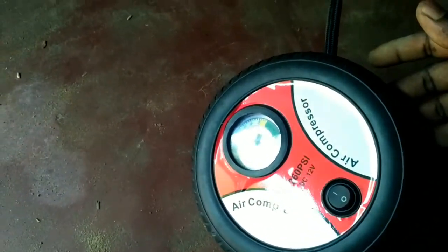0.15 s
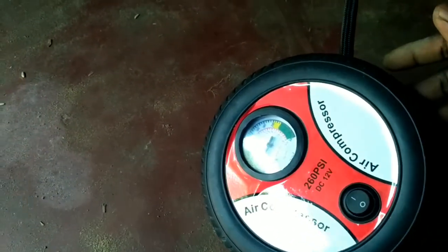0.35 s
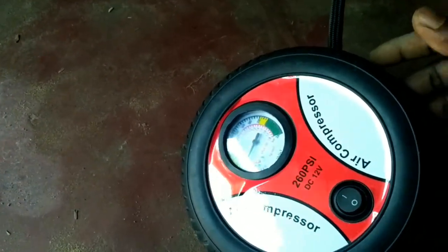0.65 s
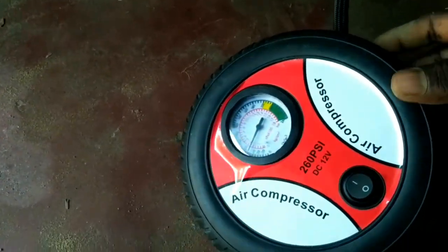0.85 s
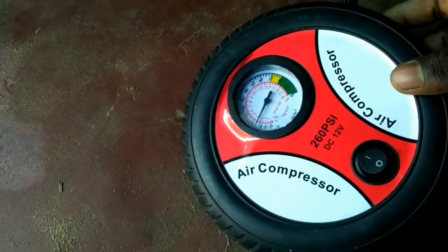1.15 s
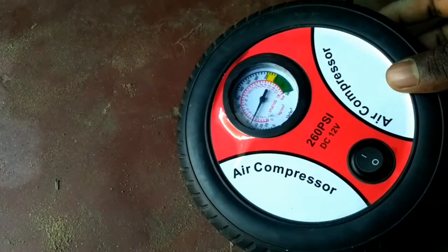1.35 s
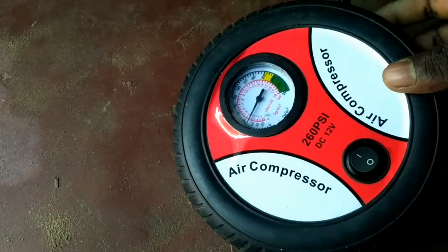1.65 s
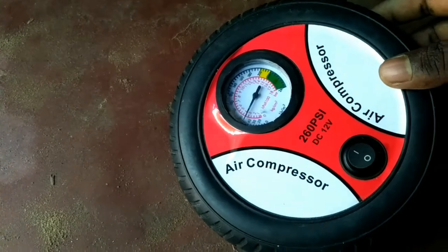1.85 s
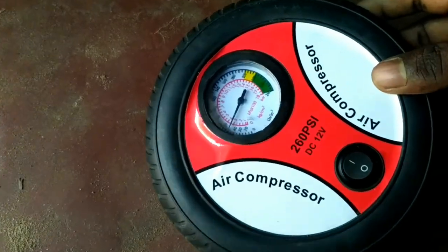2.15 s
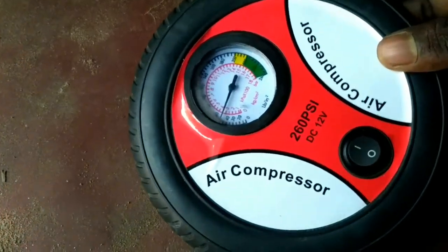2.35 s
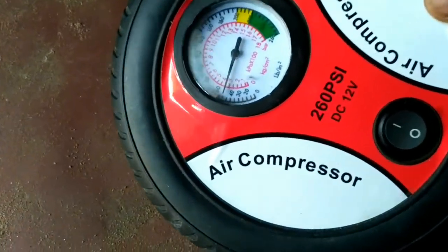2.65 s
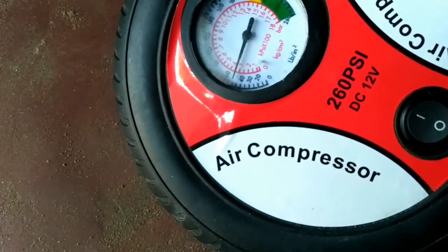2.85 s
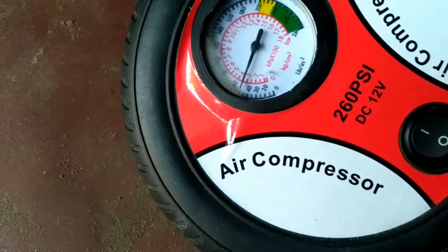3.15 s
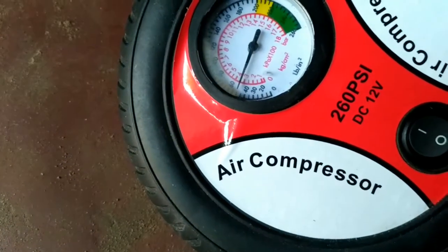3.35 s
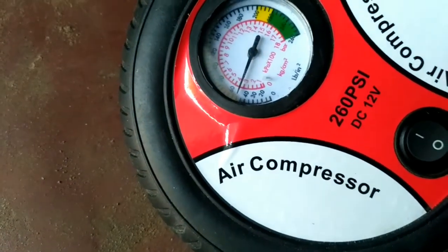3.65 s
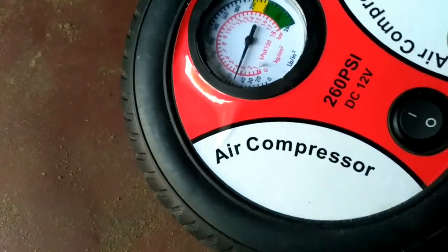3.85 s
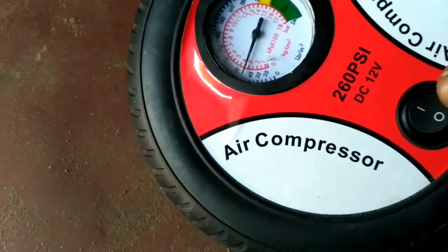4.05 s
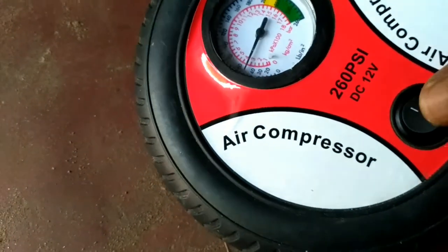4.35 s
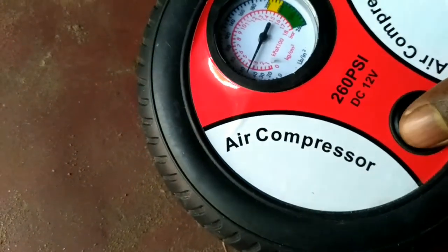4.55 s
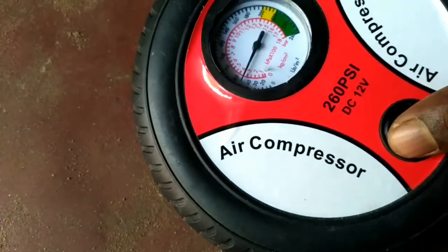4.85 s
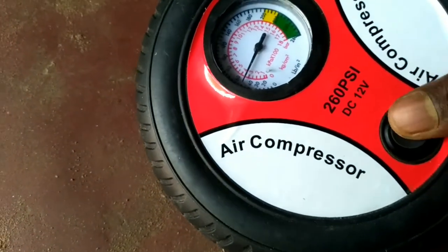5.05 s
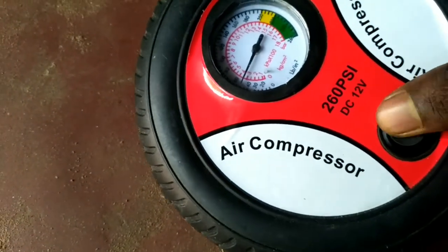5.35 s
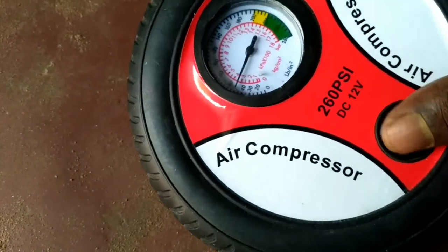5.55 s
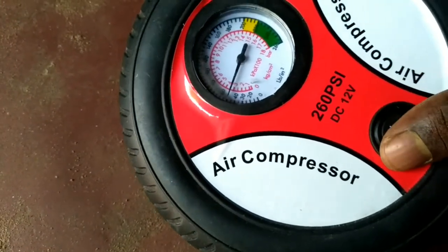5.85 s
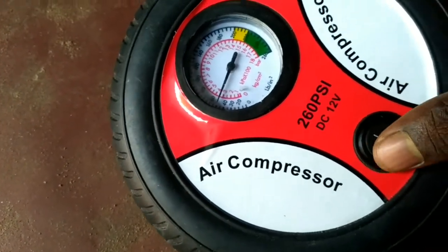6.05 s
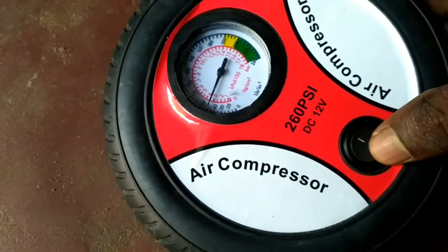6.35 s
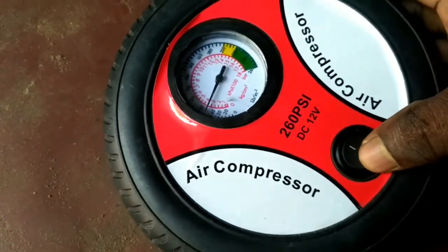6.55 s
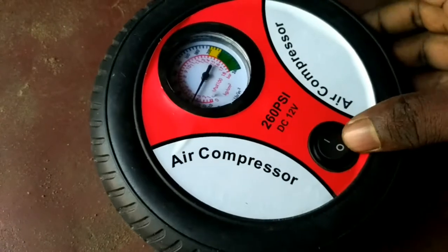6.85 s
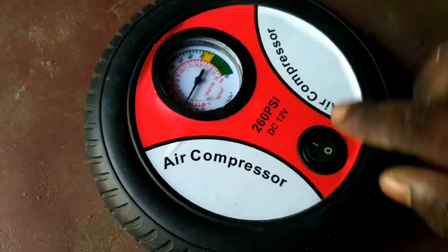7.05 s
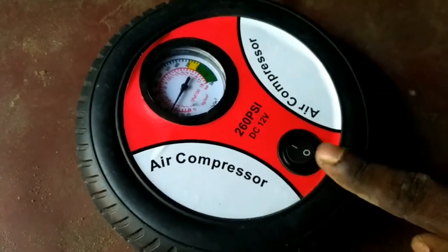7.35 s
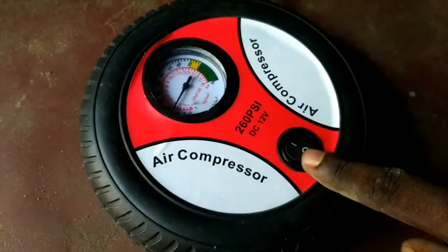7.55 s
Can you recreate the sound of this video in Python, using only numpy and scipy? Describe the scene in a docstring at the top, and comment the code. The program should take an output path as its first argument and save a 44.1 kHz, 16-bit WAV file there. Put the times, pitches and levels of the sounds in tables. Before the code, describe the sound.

A small piston air compressor hammers steadily up close, a loud buzzing drone with gear whine, rattle and hissing air, never stopping.

```python
"""On a concrete floor, right under a phone, a small piston compressor is held while it pumps up a tyre.
A three-pole motor drives the crank through a 12:51 gear: the case drones in step with the turns,
the teeth sing on the compression stroke, air and loose parts rasp, and the valve whistles.
The colour changes as the phone leans in, a finger presses, a thumb rests on the lid and the hand lets go.
The phone's fast limiter flattens the peaks."""
import sys
import numpy as np
from scipy import signal
from scipy.fft import rfft, irfft
from scipy.io import wavfile
from scipy.ndimage import uniform_filter1d, minimum_filter1d, map_coordinates

SR = 44100
rng = np.random.default_rng(int(sys.argv[2]) if len(sys.argv) > 2 else 0)


def store_pcm(level_fs):
    """Save levels as 16-bit WAV."""
    pcm = np.round(np.clip(level_fs, -1, 1) * 32767).astype(np.int16)
    wavfile.write(sys.argv[1], SR, np.atleast_2d(pcm).T)


N = 339570  # length [samples]

# crank speed: (time [s], speed [turns per second])
CRANK_SPEED = [(0.0, 44.99), (1.1, 44.92), (1.32, 45.23), (1.94, 44.7), (2.24, 44.91), (2.62, 44.44),
               (2.7, 44.67), (3.86, 44.95), (4.16, 44.86), (4.52, 44.74), (4.82, 43.68), (5.26, 44.55),
               (5.72, 44.46), (5.9, 44.04), (6.16, 44.39), (6.48, 43.92), (7.5, 44.41), (7.7, 43.75)]
# balance of the drone's tones: (multiple of the crank speed, relative level [dB])
DRONE_TONES = [(3, -22), (4, -21.5), (5, -15.5), (6, -16), (7, -13.5), (8, -18), (10, -4), (11, 1),
               (12, 1.5), (13, 0.5), (14, 1), (15, -2.5), (16, -2.5), (17, -8.5), (18, -5), (19, -4),
               (20, -20.5), (22, -16), (25, -31), (32, -24.5)]
# knocks of piston and valve, which set how the drone's tones line up in time:
# (place [turns], signed force when held [relative], when pressed [relative], when loose [relative])
KNOCKS = [(.08, .21, .06, .07), (.29, 0, .19, .26), (.506, -.5, -.22, -.2), (.592, .18, .34, 0),
          (.807, -.33, -.16, -.2)]
# one turn of the crank: (place [turns], tooth load [dB], air flow [dB])
STROKE = [(.05, 5.5, 0), (0.16, 7.5, -1), (.3, -11, -9.5), (.42, -2, -12), (.54, -23, -2.5), (.67, -21, -6),
          (.77, -15, -8.5), (.86, -8, 1.5), (.96, 4.5, 2)]
# tone colours, each (frequency [Hz], relative level [dB])
AIR_COLOUR = [(1500, -3.5), (2500, -2), (3200, -7), (3700, -9), (4100, -10.5), (4700, 4), (5600, -2),
              (6800, 0), (7800, -1.5), (9000, -0.5), (10000, -4), (11000, 4.5), (11900, -10.5),
              (15500, -32)]
CLATTER_COLOUR = [(500, 1), (950, -8), (1150, 6.5), (1450, 5), (1800, 1.5), (2300, 9), (2650, 3),
                  (3100, -8), (8000, -19)]
SHUDDER_COLOUR = [(20, -9.5), (42, -17), (65, -15), (100, -16), (160, -8.5), (230, -3.5), (330, -0.5),
                  (420, -5), (560, 3.5), (820, -1), (1000, -12.5), (4000, -92)]
WHISTLE_COLOUR = [(6000, -36), (8500, -6.5), (9050, 6.5), (9600, -6), (13000, -46)]
GEARBOX_COLOUR = [(1700, 10), (2050, 1), (2180, 7.5), (2280, 5), (2380, 7.5), (2700, -8), (4500, 7),
                  (9000, -30)]
# taps of the loose case on the floor, over four turns:
# (place [turns], frequency [Hz], width [Hz], level [dB])
TAPS = [(.4, 1550, 390, -29), (1.25, 1090, 350, -30), (2.25, 1080, 350, -23), (3.0, 2640, 200, -39),
        (3.3, 1520, 350, -31)]
# the phone leans in over the gauge and backs off: (time [s], nearness [0-1])
NEARNESS = [(0, 0), (1.1, 0), (2.2, 0.18), (2.8, 0.76), (3.7, 0.56), (4.6, 0.62), (6.5, 0.61), (7.7, 0.18)]
# a finger presses on the case at the switch: (time [s], half length [s], force [0-1])
PRESSES = [(4.835, 0.44, 1), (5.447, 0.12, .3), (5.87, 0.12, 0.66), (6.43, 0.41, .6), (7.615, 0.11, 0.95)]
# a thumb rests on the lid: (time [s], contact [0-1])
THUMB = [(.8, 0), (1.15, 0.9), (2.3, 0.9), (2.65, 0.3)]
# how each part answers the handling:
# (held with the phone far, change when near, change under full press, change when loose)
CASE_HZ = (590, -2.5, -19, -38)  # main resonance of the case, all [Hz]
RESONANCE_DB = (11, 11, 1.6, 8.4)  # how far it stands out, all [dB]; the levels below are [dB] too
DRONE_DB = (-16.5, -1, -0.5, 0)
HUM_DB = (-22.5, 1, -6, -14.5)
SHUDDER_DB = (-26.5, 0.5, 3, 4)
CLATTER_DB = (-32, -0.5, -.5, 0)
AIR_DB = (-41, -4.5, 3.5, -5)  # before the tyre starts to fill
SLAP_DB = (-43, 1.5, -6.5, 1.5)
LOPE_DB = (0.75, 2.8, 0.5, 0.4)  # swing of the tooth load between strong and weak strokes
# one knock of the teeth on the return stroke: (place [turns], frequency [Hz], width of one pass [Hz])
BACKLASH = (.6, 2190, 260)
# gear levels: (time [s], whine under compression [dB], knock on the return stroke [dB])
GEAR_LEVELS = [(0, -19, -36), (.4, -23, -40.5), (1.1, -26, -39), (1.4, -30, -55), (1.9, -25.5, -35.5),
               (2.2, -27.5, -39), (2.55, -23.5, -35.5), (2.95, -30, -40), (3.9, -33, -45), (4.4, -29, -35),
               (4.8, -28, -33.5), (6.6, -27.5, -35), (6.9, -31.5, -43), (7.15, -26.5, -46),
               (7.45, -29.5, -42), (7.65, -25, -23)]
# valve whistle: (time [s], level [dB])
WHISTLE_LEVEL = [(0, -38), (.75, -38), (1.05, -45), (2, -42), (2.9, -37), (4, -38), (4.8, -42.5),
                 (7.7, -43.5)]
# piston slaps over four turns: (place [turns], strength [dB])
SLAPS = [(1.24, 6), (1.66, 7.5), (2.25, 1), (2.92, -3), (3.75, 2)]
# panels of the case: (frequency [Hz], width [Hz], lift when held [dB],
# change when near [dB], change when pressed [dB], change when loose [dB])
PANELS = [(220, 15, -7, 8, 4, -2), (437, 47, 1.5, 2, -0.5, 5.5), (728, 250, -1, 1, 1, -9),
          (807, 93, -15, 5, 5, -13)]
# cylinder wall rung by a slap: (frequency [Hz], width of one pass [Hz], level at the centre [dB])
BORE = [(1350, 970, 0), (2180, 720, 2), (3120, 760, -15)]
# cylinder and housing: (frequency [Hz], width [Hz], level when held [dB], change when near [dB],
# change when pressed [dB], change when loose [dB], change under the thumb [dB])
RINGS = [(2324, 120, -43, 9.5, -10, -6, -5), (2613, 96, -41, 0.5, -11.5, -1, 0),
         (3040, 600, -53, 18.5, -6, -7, -6), (3560, 180, -55, 7, 1, 5, 2),
         (4650, 140, -45.5, -9, 4.5, 2, -17), (4876, 170, -48, -7, -5.5, -5.5, 3),
         (6190, 120, -47.5, -13.5, 1, -1, -3), (6430, 160, -56.5, 7.5, -3, 0, 6),
         (6800, 150, -46, -7, -1, -7, -3), (7240, 140, -59, 16, -1, 4, -8),
         (9680, 300, -44, -28, 2, -8, -9), (10790, 250, -51.5, 0, -4, 1, 2.5),
         (11190, 180, -54.5, -7.5, -2, -7, 0)]

TEETH, PINION, POLES = 51, 12, 3  # gear teeth, pinion teeth, motor poles
START_TURN = .64  # place of the crank at the start [turns]
TOP_HZ = 15500
LET_GO_S, LET_GO_TAKES_S, HOLD_AGAIN_S, HOLD_TAKES_S = 6.69, 0.11, 7.52, 0.093
CASE_WIDTH_HZ = 116
FLOW_DB_PER_S = -0.3  # less air flows as the tyre fills
# the motor slows against each compression, more as back pressure builds:
# share of its speed at first and in the end, time constant [s], place [turns]
SAG_FIRST, SAG_LAST, BUILD_S, SAG_PLACE = 0.012, 0.04, 0.96, 0.06
# the valve clacks hardest on one stroke in four: place and length [turns], rise [dB]
CLACK_PLACE, CLACK_TURNS, CLACK_DB = 2.96, 0.055, 5.5


def undb(db):
    """Turn decibels into gain."""
    return 10 ** (np.asarray(db) / 20)


def unit(x):
    """Scale to an average strength (rms) of 1."""
    return x / np.sqrt(np.mean(np.abs(x) ** 2))


def seconds():
    """Time of each sample."""
    return np.arange(N) / SR


def frequencies():
    """Frequencies of the spectrum, kept above zero."""
    return np.maximum(np.fft.rfftfreq(N, 1 / SR), 1)


def curves(table):
    """Draw each column of a timed table sample by sample."""
    s, *columns = np.transpose(table)
    return [np.interp(seconds(), s, column) for column in columns]


def walk(rate):
    """Smooth chance that changes about rate times a second, with spread 1."""
    k = max(int(SR / rate), 1)
    smooth = uniform_filter1d(rng.standard_normal(N), k, mode="wrap")
    return unit(uniform_filter1d(smooth, k, mode="wrap"))


def colour(x, points):
    """Filter by an outline of frequency and level, then scale to rms 1."""
    hz, db = np.transpose(points)
    outline_db = np.interp(np.log(frequencies()), np.log(hz), db)
    return unit(irfft(rfft(x) * undb(outline_db), N))


def resonance(hz, centre_hz, width_hz):
    """Strength and phase with which one mode answers, 1 at its centre."""
    return 1 / (1 + 1j * (hz ** 2 - centre_hz ** 2) / (hz * width_hz))


def touch(turn, place, length_turns):
    """A brief contact that returns every fourth turn."""
    distance = (turn - place + 2) % 4 - 2
    return np.exp(-.5 * (distance / length_turns) ** 2)


def handling():
    """Nearness of the phone, finger force, looseness of the case and thumb contact, each about 0-1."""
    t = seconds()
    near, = curves(NEARNESS)
    thumb, = curves(THUMB)
    press = sum(force * np.exp(-((t - s) / half_s) ** 2) for s, half_s, force in PRESSES)
    freed = (t - LET_GO_S) / LET_GO_TAKES_S
    caught = (HOLD_AGAIN_S - t) / HOLD_TAKES_S
    loose = np.clip(np.minimum(freed, caught) + .5, 0, 1)
    return near, press, loose, thumb


def rasp(turn, repeat, grain_db, gear_share=0.28):
    """Dense ticks: rough spots return with each turn or each round of the teeth, mixed with fresh ones."""
    def worn(cycle, size):
        """Read the same rough spots again in every cycle."""
        return map_coordinates(rng.standard_normal(size), [cycle % 1 * size], order=3, mode="grid-wrap")
    crank_spots = np.sqrt(1 - gear_share) * worn(turn, size=990)
    gear_spots = np.sqrt(gear_share) * worn(turn / 4, size=3960)
    fresh = np.sqrt(1 - repeat) * rng.standard_normal(N)
    return (np.sqrt(repeat) * (crank_spots + gear_spots) + fresh) * undb(grain_db * walk(590))


def shudder(turn):
    """Loose parts give a low rasp that mostly repeats with the gear teeth."""
    return colour(rasp(turn, repeat=0.86, grain_db=0.9, gear_share=0.77), SHUDDER_COLOUR)


def clatter(turn, flow, lope_db):
    """Loose parts rasp in the middle range, more with the air flow and on strong strokes."""
    ticks = rasp(turn, repeat=0.87, grain_db=0.8, gear_share=0.32)
    return colour(ticks * flow ** 0.41 * undb(0.5 * lope_db), CLATTER_COLOUR)


def air(turn, flow):
    """Air rushes as rough noise that swells with the flow in each stroke."""
    return colour(rasp(turn, repeat=0.85, grain_db=0.5, gear_share=0.43) * flow, AIR_COLOUR)


def whistle(turn, flow):
    """A narrow band of noise: the valve whistles most as it first lifts."""
    valve_db = 4 * np.cos(2 * np.pi * (turn - .87))
    ticks = rasp(turn, repeat=0.17, grain_db=1.5, gear_share=0.41)
    return colour(ticks * flow * undb(valve_db), WHISTLE_COLOUR)


def rings(turn, flow, handled, skirt=0.23):
    """Flow ticks and valve clacks ring narrow modes of cylinder and housing; handling sets their levels."""
    clack = undb(CLACK_DB * touch(turn, CLACK_PLACE, CLACK_TURNS))
    push = rfft(rasp(turn, repeat=0.18, grain_db=1.5, gear_share=0.96) * flow * clack)
    bins = frequencies()
    out = 0
    for hz, width_hz, *rule in RINGS:
        # the broad second response trims sound far from the mode
        response = resonance(bins, hz, width_hz) * resonance(bins, hz, skirt * hz)
        out = out + unit(irfft(push * response, N)) * undb(handled(rule))
    return out


def drone(turn, crank_hz, modes, press, loose, jitter=0.0038, uneven_db=1.32):
    """Tones locked to the crank, timed by its knocks and shaped by case modes that the handling shifts."""
    place, *forces = np.transpose(KNOCKS)
    spin = np.exp(2j * np.pi * (turn + jitter * walk(55)))
    out, power = 0, 0
    for k, db in DRONE_TONES:
        k = round(k)
        hz = k * crank_hz
        knocks = np.array(forces) @ np.exp(-2j * np.pi * k * place)
        held, pressed, let_go = knocks * resonance(hz, 532, 160)
        # only the phase of the knocks is used; the tone's strength comes from its table and the modes
        lead = np.angle(held) + press * np.angle(pressed / held) + loose * np.angle(let_go / held)
        lift_db = sum(height_db * np.abs(resonance(hz, mode_hz, width_hz)) ** 2
                      for mode_hz, width_hz, height_db in modes)
        gain = undb(db + lift_db - lift_db.mean())
        out = out + gain * (spin ** k * np.exp(1j * lead)).real
        power = power + gain ** 2
    # keep the total steady while the balance of the tones moves
    return unit(out / np.sqrt(power)) * undb(uneven_db * walk(64))


def motor(shaft, unbalance_db=-24):
    """The armature hums at three poles a turn, with a weak tone from its unbalance."""
    angle = 2 * np.pi * shaft
    return unit(undb(unbalance_db) * np.sin(angle) - np.sin(POLES * angle))


def gear(shaft, load_db, runout_db=2.5, rough_db=1.2, slip=0.009, second_db=-28):
    """Teeth sing under load; the pinion runs slightly off centre and the teeth have play."""
    mesh = 2 * np.pi * (PINION * shaft + slip * walk(380))
    runout = runout_db * np.cos(2 * np.pi * shaft)
    force = undb(load_db + runout + rough_db * walk(190))
    whine = force * (np.sin(mesh) + undb(second_db) * np.sin(2 * mesh))
    return colour(whine, GEARBOX_COLOUR)


def backlash(turn, length_turns=0.0028, uneven_db=3.0):
    """On the return stroke the teeth fall through their play and ring the gearbox."""
    place, hz, width_hz = BACKLASH
    distance = (turn - place + .5) % 1 - .5
    blow = np.exp(-.5 * (distance / length_turns) ** 2) * undb(uneven_db * walk(41))
    return unit(irfft(rfft(blow) * resonance(frequencies(), hz, width_hz) ** 2, N))


def slap(turn, length_turns=0.092):
    """Short rough knocks of the piston on the bore, in a four-turn pattern, ring the cylinder wall."""
    bins = frequencies()
    contact = sum(undb(db) * touch(turn, place, length_turns) for place, db in SLAPS)
    wall = sum(undb(db) * resonance(bins, hz, width_hz) ** 2 for hz, width_hz, db in BORE)
    knocks = contact * rasp(turn, repeat=0.8, grain_db=0.5)
    return unit(irfft(rfft(knocks) * wall, N))


def taps(turn, length_turns=.05):
    """Let go, the case rocks with the strokes and its rim buzzes briefly on the floor."""
    bins = frequencies()
    out = 0
    for place, hz, width_hz, db in TAPS:
        contact = touch(turn, place, length_turns)
        response = resonance(bins, hz, width_hz) * resonance(bins, hz, hz)
        ring = irfft(rfft(contact * rng.standard_normal(N)) * response, N)
        out = out + unit(ring) * np.sqrt(np.mean(contact ** 2)) * undb(db)
    return out


def scene():
    """The crank angle times every part of the machine; the handling sets their balance."""
    near, press, loose, thumb = handling()

    def handled(rule):
        """Add the changes from the handling to the held value."""
        held, *changes = rule
        return held + sum(change * control for change, control in zip(changes, (near, press, loose, thumb)))

    crank_hz, = curves(CRANK_SPEED)
    turn = START_TURN + np.cumsum(crank_hz) / SR
    place, *columns = np.transpose(STROKE)
    load_db, flow_db = (np.interp(turn, place, column, period=1) for column in columns)
    sag = SAG_LAST + (SAG_FIRST - SAG_LAST) * np.exp(-seconds() / BUILD_S)
    lag = sag * np.sin(2 * np.pi * (turn - SAG_PLACE)) / (2 * np.pi)
    shaft = TEETH / PINION * (turn - lag)
    # the same teeth meet again every fourth turn, so strong and weak strokes take turns
    lope_db = handled(LOPE_DB) * np.cos(2 * np.pi * (turn / 4 + .12))
    flow = undb(flow_db + 0.2 * lope_db + 0.48 * np.cos(2 * np.pi * shaft) + 0.44 * walk(92))
    filling = undb(FLOW_DB_PER_S * seconds())

    modes = [(handled(CASE_HZ), CASE_WIDTH_HZ, handled(RESONANCE_DB))]
    modes += [(hz, width_hz, handled(rule)) for hz, width_hz, *rule in PANELS]
    whine_db, backlash_db = curves(GEAR_LEVELS)
    whistle_db, = curves(WHISTLE_LEVEL)
    out = shudder(turn) * undb(handled(SHUDDER_DB))
    out += clatter(turn, flow, lope_db) * undb(handled(CLATTER_DB))
    out += air(turn, flow) * undb(handled(AIR_DB)) * filling
    out += whistle(turn, flow) * undb(whistle_db)
    out += rings(turn, flow, handled) * filling
    # the drone is fullest on the weak strokes, the gears loudest on the strong ones
    out += drone(turn, crank_hz.mean(), modes, press, loose) * undb(handled(DRONE_DB) - 0.42 * lope_db)
    out += motor(shaft) * undb(handled(HUM_DB))
    out += gear(shaft, load_db + lope_db) * undb(whine_db)
    out += backlash(turn) * undb(backlash_db + 0.56 * lope_db)
    out += slap(turn) * undb(handled(SLAP_DB))
    out += taps(turn) * loose
    return out[None]


def limiter(x, ceiling_db=-15.0, hold_s=0.00094):
    """Looks a moment ahead and turns the gain down enough for each peak."""
    k = max(int(hold_s * SR), 1)
    gain = np.minimum(1, undb(ceiling_db) / (np.abs(x) + 1e-9))
    return x * uniform_filter1d(minimum_filter1d(gain, k), k)


def record(dry):
    """The phone limits the peaks, then cuts the top of the treble."""
    low_pass = signal.ellip(10, .2, 80, TOP_HZ, fs=SR, output="sos")
    return signal.sosfilt(low_pass, limiter(dry))


dry = scene()
out = record(dry)
store_pcm(out)
```